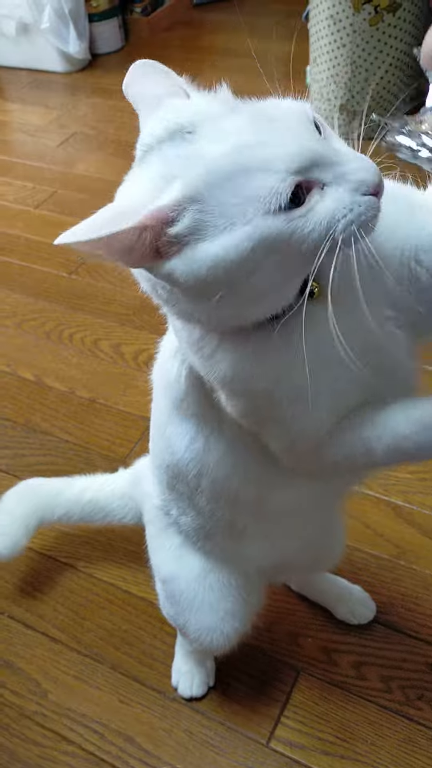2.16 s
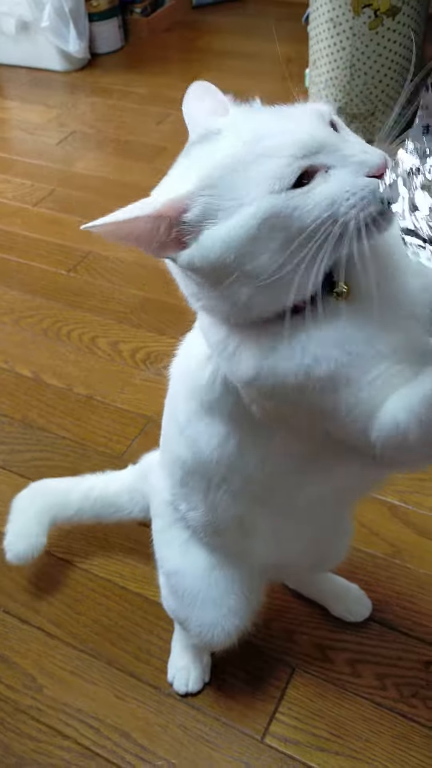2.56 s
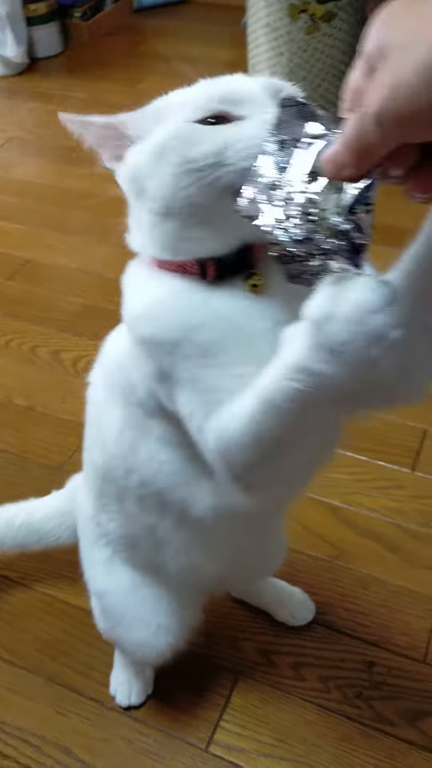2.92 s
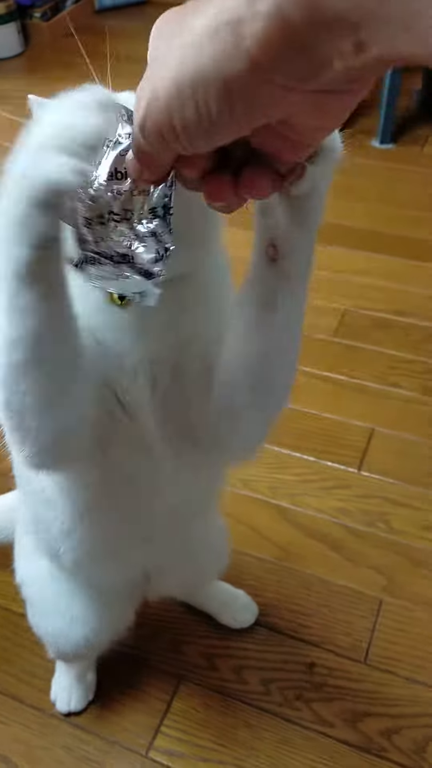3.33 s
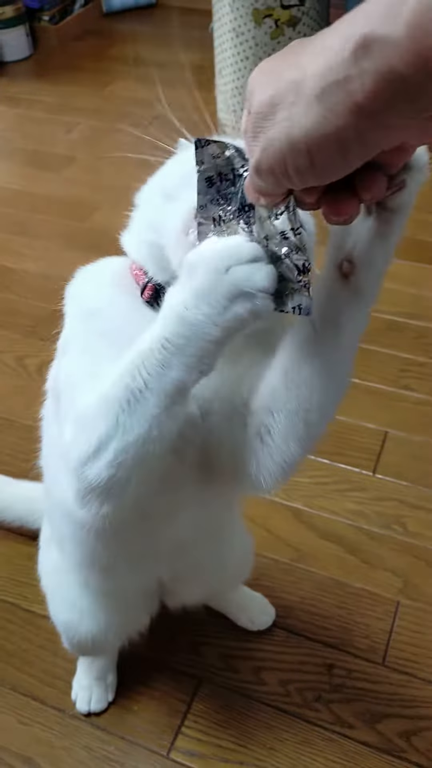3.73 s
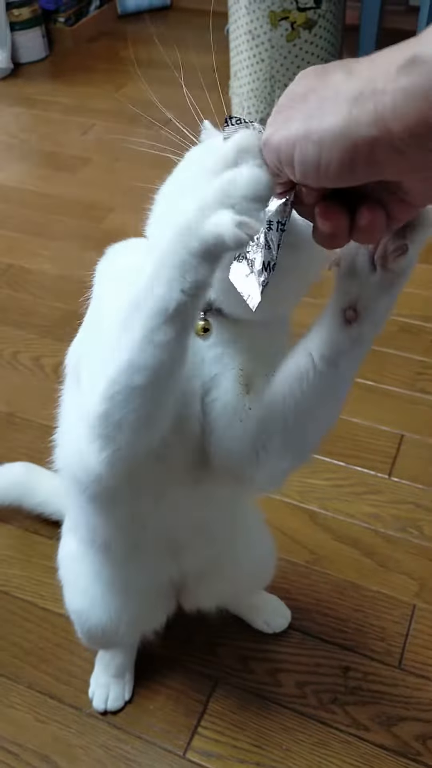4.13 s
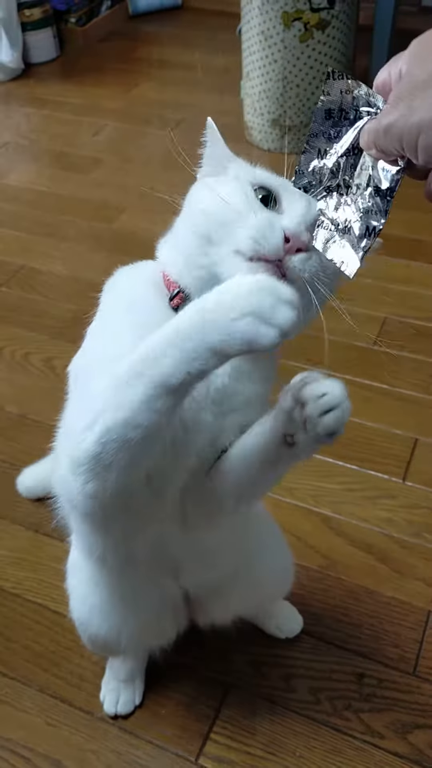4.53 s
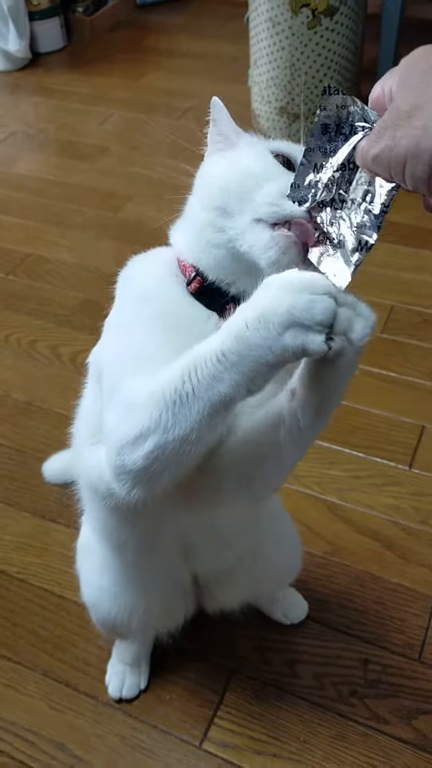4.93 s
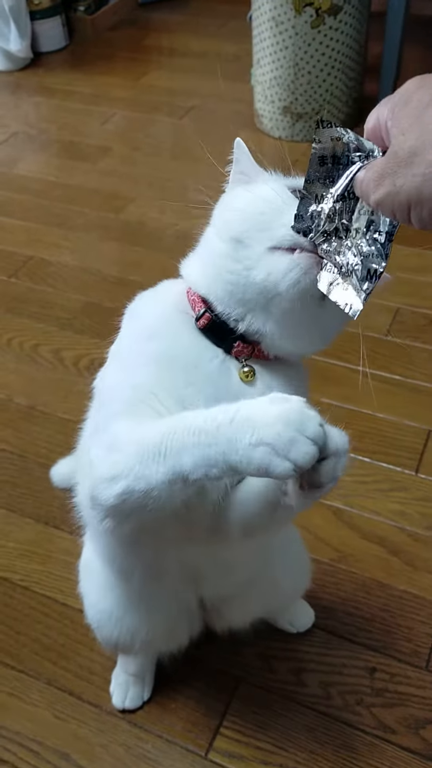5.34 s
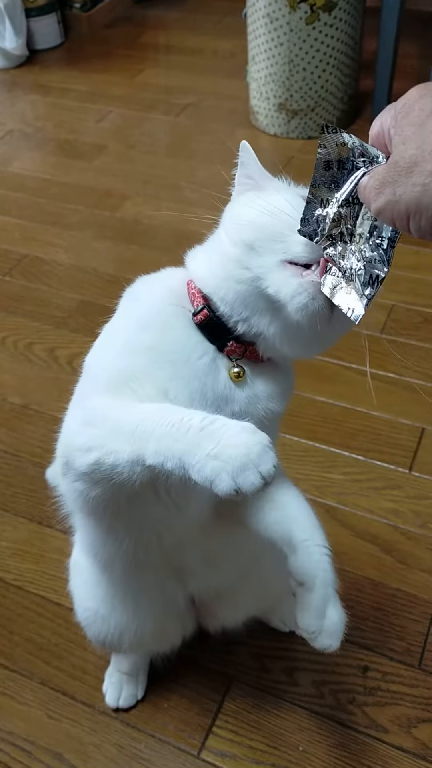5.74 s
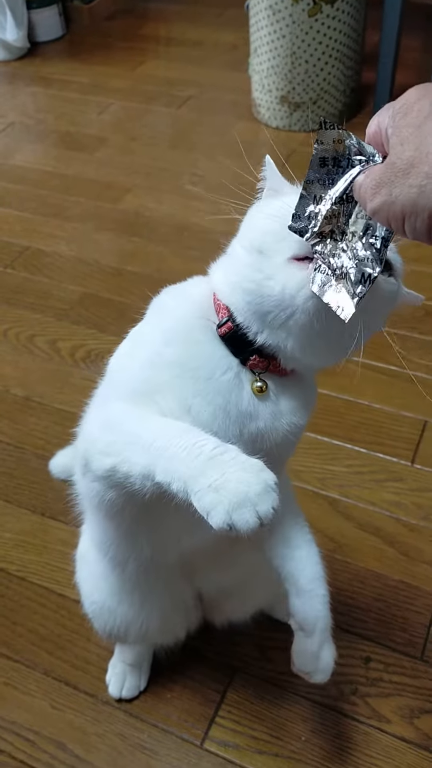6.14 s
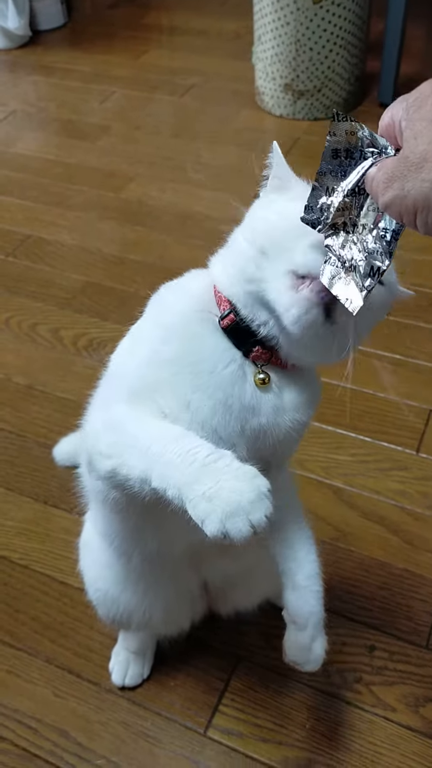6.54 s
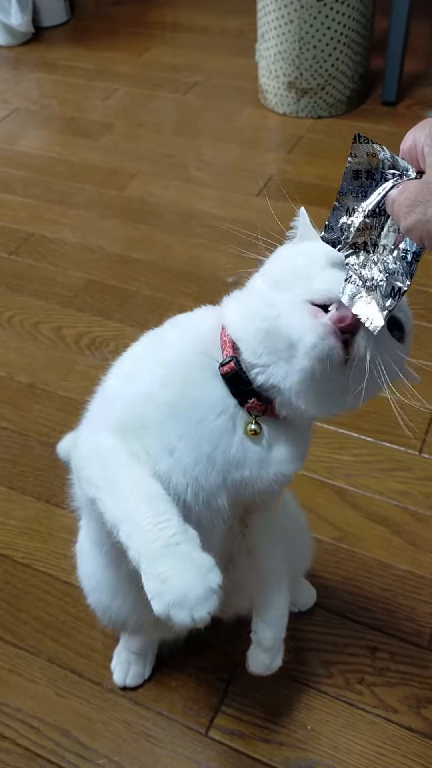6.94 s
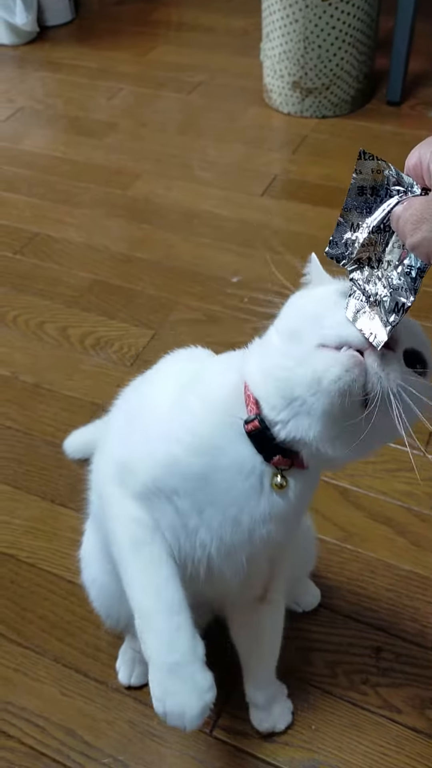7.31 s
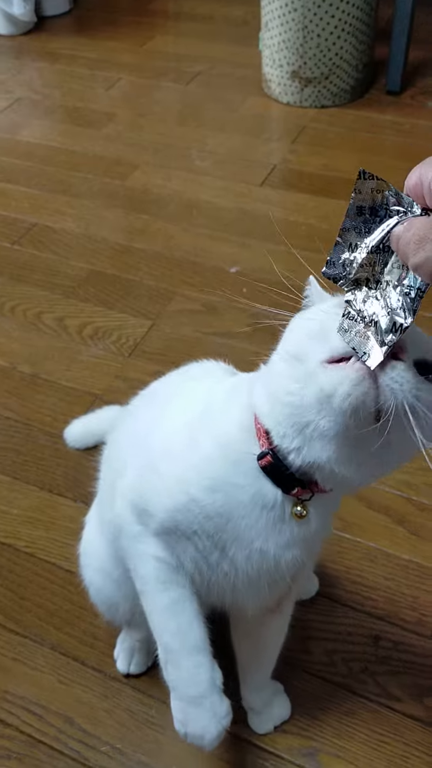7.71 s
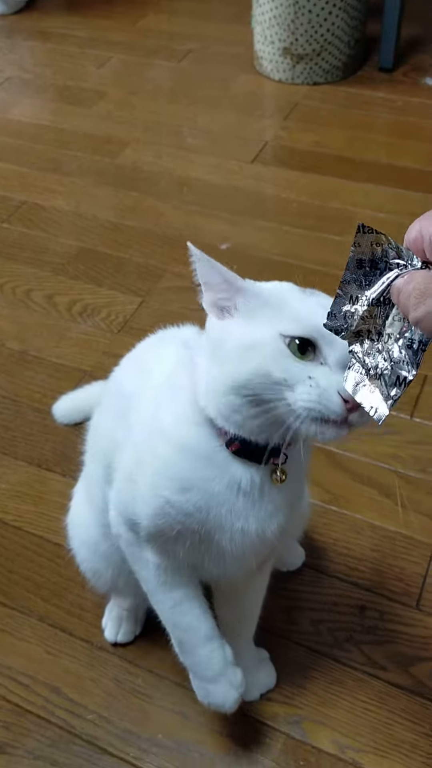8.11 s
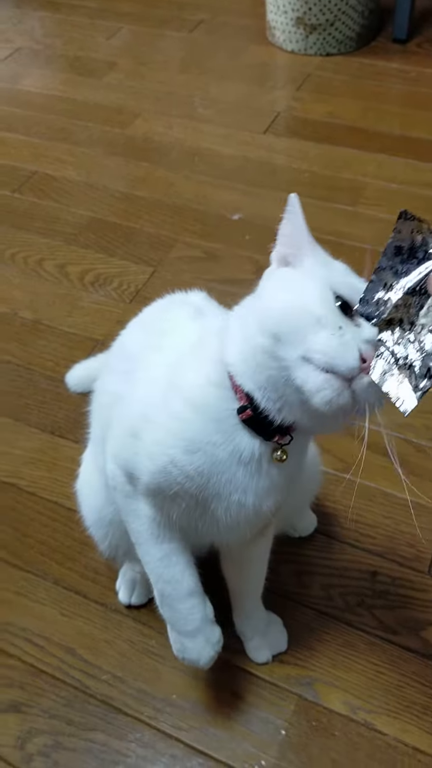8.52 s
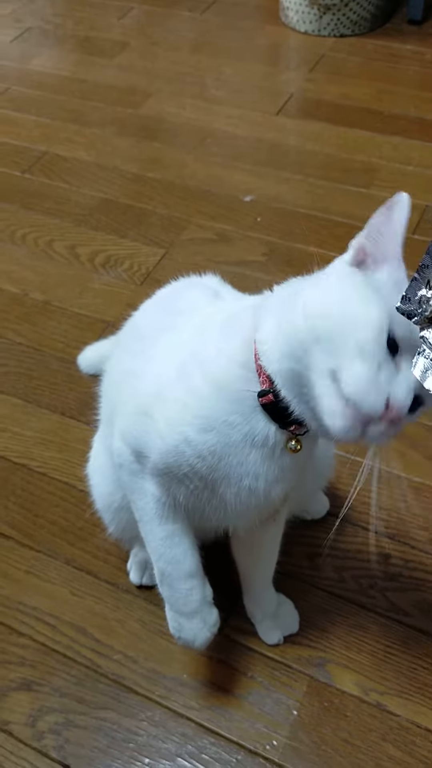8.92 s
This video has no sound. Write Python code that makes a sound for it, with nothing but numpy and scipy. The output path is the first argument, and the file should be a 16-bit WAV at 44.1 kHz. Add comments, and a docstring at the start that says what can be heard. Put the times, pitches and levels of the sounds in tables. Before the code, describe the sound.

Close, bright foil crinkling and snapping in bursts for five seconds, then sparse soft rustles, a tiny collar bell and distant bird whistles.

```python
"""A crumpled foil packet, bitten, pawed and licked by a cat in a wood-floored room.
Creases are struck decaying modes; rustle is dense ringing grains plus rubbing noise; folds pop.
A collar bell (struck modes) tinkles, a bird (gliding near sines) whistles further off,
and air noise, a low resonance and a wavering hum lie under it all. Treble is cut steeply."""
import sys
import numpy as np
from scipy import signal
from scipy.fft import rfft, irfft, next_fast_len
from scipy.io import wavfile
from scipy.ndimage import uniform_filter1d

SR = 44100
rng = np.random.default_rng(int(sys.argv[2]) if len(sys.argv) > 2 else 0)


def convert_level_to_amplitude(level_db):
    """Map a level in decibels to its linear amplitude factor."""
    exponent = np.asarray(level_db, float) / 20
    return 10 ** exponent


def transcribe(signal):
    """Save signal, clipped to [-1, 1], as a 16-bit WAV file at the path in sys.argv[1]."""
    frames = np.atleast_2d(signal).T
    limited = np.clip(frames, -1, 1)
    pcm = np.round(limited * 32767).astype(np.int16)
    wavfile.write(sys.argv[1], SR, pcm)


N = 404397


def rms_one(x):
    """Scale to rms 1."""
    return x / np.sqrt(np.mean(x ** 2) + 1e-20)


def in_time(rows):
    """Interpolate each column of a time curve to one value per sample."""
    s, *columns = np.transpose(rows)
    return [np.interp(np.arange(N) / SR, s, c) for c in columns]


def coloured(x, spectrum):
    """Filter a steady sound by a dB curve, linear over log frequency."""
    size = next_fast_len(N)
    hz = np.maximum(np.fft.rfftfreq(size, 1 / SR), 1)
    point_hz, point_db = np.transpose(spectrum)
    gain = convert_level_to_amplitude(np.interp(np.log(hz), np.log(point_hz), point_db))
    return irfft(rfft(x, size) * gain, size)[:N]


def drift(rate_hz):
    """Slow random curve, rms 1: noise through a two-pole lowpass, run in for 1 s."""
    r = np.exp(-2 * np.pi * rate_hz / SR)
    return rms_one(signal.lfilter([1], [1, -2 * r, r * r], rng.standard_normal(N + SR))[SR:])


def struck(modes, strengths, t):
    """Sum of exponentially decaying sines, scaled to peak 1."""
    hz, level_db, t60_s = np.transpose(modes)[:, :, None]
    envelopes = strengths[:, None] * convert_level_to_amplitude(level_db - 60 * t / t60_s)
    x = np.sum(envelopes * np.sin(2 * np.pi * hz * t), axis=0)
    return x / np.max(np.abs(x))


def add(out, s, x):
    """Mix a short sound in at time s."""
    i = max(round(s * SR), 0)
    out[i:i + len(x)] += x[:N - i]


# air noise spectrum, relative: f/Hz, level/dB
AIR_SPECTRUM = [(62, -26.5), (105, -3.5), (136, -3), (215, -4), (625, -19), (1170, -20), (1620, -25),
                (3450, -22), (5470, -36), (7200, -26), (8500, -41.5), (11000, -71.5), (18700, -120)]
# air noise rms in 100-450 Hz: t/s, level/dB
AIR_BAND_LEVEL = [(0.0, -71), (3.47, -70.5), (9.17, -76.5)]
# low room resonance, rms at mean air level: f/Hz, width/Hz, level/dB
ROOM_RUMBLE = [(42.4, 21, -66)]


def background():
    """Air noise, noise in a low resonance and a wavering motor hum, all on the air level curve."""
    hum_hz, hum_db = 85.4, -68
    air = coloured(rng.standard_normal(N), AIR_SPECTRUM)
    band = signal.butter(4, [100, 450], "band", fs=SR, output="sos")
    air = air / np.std(signal.sosfilt(band, air))
    level = convert_level_to_amplitude(in_time(AIR_BAND_LEVEL)[0])

    phase = 2 * np.pi * np.cumsum(hum_hz + 3.5 * drift(6.0)) / SR
    low_end = convert_level_to_amplitude(hum_db + 2.0 * drift(7.5)) * np.sqrt(2) * np.sin(phase)
    for hz, width_hz, level_db in ROOM_RUMBLE:
        r = np.exp(-np.pi * width_hz / SR)
        poles = [1, -2 * r * np.cos(2 * np.pi * hz / SR), r * r]
        tone = signal.lfilter([1, 0, -1], poles, rng.standard_normal(N + SR))[SR:]
        low_end += convert_level_to_amplitude(level_db) * rms_one(tone)
    return level * (air + low_end / np.mean(level))


# steady rustle, how firmly the packet is held and worked: t/s, level/dB
HANDLING_LEVEL = [(0.0, -56), (0.45, -67), (0.52, -71), (0.9, -67), (2.1, -64), (2.3, -78), (2.45, -61),
                  (2.95, -74.5), (3.6, -58.5), (4.15, -61), (4.25, -69), (4.95, -65.5), (5.07, -68.5),
                  (5.5, -70.5), (5.7, -76), (9.17, -80)]
# paw or tongue drags over the foil: t/s at top, level/dB, swell/s per 10 dB
FOIL_DRAGS = [(0.14, -55.5, 0.026), (1.159, -60.5, 0.076), (1.512, -51.5, 0.034), (2.0, -51.5, 0.049),
              (2.75, -47, 0.024), (3.31, -52, 0.08), (3.912, -48.5, 0.11), (4.979, -61, .06),
              (5.272, -60.5, 0.075), (5.562, -61.5, .03), (6.11, -54.5, 0.019), (6.402, -58.5, 0.02),
              (7.001, -62.5, 0.031), (7.668, -56, .04), (7.888, -61.5, 0.096)]


def rustle_level():
    """Power sum in dB: steady handling, a flurry of small creases around each snap, and drags."""
    flurry_db, follows_snap = -57.5, 0.6     # flurry top at a -24 dB snap; dB per dB of snap
    build_db_per_s, fade_db_per_s = 902.5, 152
    t = np.arange(0, N, 50)[:, None] / SR
    s, peak_db = np.transpose(CREASE_SNAPS)
    slope_db = np.where(t < s, build_db_per_s * (s - t), fade_db_per_s * (t - s))
    flurries = flurry_db + follows_snap * (peak_db + 24) - slope_db
    s, top_db, swell_s = np.transpose(FOIL_DRAGS)
    drags = top_db - 10 * np.abs(t - s) / swell_s
    power = np.sum(convert_level_to_amplitude(2 * flurries), axis=1) + np.sum(convert_level_to_amplitude(2 * drags), axis=1)
    power = np.interp(np.arange(N) / SR, t[:, 0], power)
    return 10 * np.log10(power + convert_level_to_amplitude(2 * in_time(HANDLING_LEVEL)[0]))


# rustle spectrum before the packet turns, relative: f/Hz, level/dB
RUSTLE_SPECTRUM = [(290, -49), (500, -18), (1250, -15.5), (1620, -20), (2120, -12), (2760, -14), (4700, 1),
                   (7200, -13), (8500, -28.5), (11000, -64), (18700, -120)]
# the packet turns, and rings higher from about 5.5 s, in the quieter handling: t/s, share turned 0-1
PACKET_TURN = [(4.9, 0.23), (5.5, 1)]
TURN_PITCH_RATIO = 1.11     # at share 1


def rustle(level_db):
    """Tiny creases in clumps, unequal in size, over the hiss of fur and tongue on foil."""
    # harder handling, more creases: 600/s at -66 dB
    per_s = 600 * convert_level_to_amplitude(0.22 * (level_db + 66.0) + 4.8 * drift(25))
    sizes = convert_level_to_amplitude(6 * np.minimum(rng.exponential(1, N), 3.5)) * rng.choice([-1, 1], N)
    born = rng.random(N) < per_s / SR
    pitches_hz, dealt = np.geomspace(1500, 7500, 8), rng.integers(0, 8, N)
    grains = 0
    for k, hz in enumerate(pitches_hz):
        r = convert_level_to_amplitude(-60 * hz / (7.0 * SR))     # 60 dB decay in 7 cycles
        w = 2 * np.pi * hz / SR
        hits = sizes * born * (dealt == k) + 1e-18
        grains = grains + signal.lfilter([0, w], [1, -2 * r * np.cos(w), r * r], hits)
    grains = grains / np.sqrt(uniform_filter1d(per_s, size=2000))     # level out crease density

    rub = rng.standard_normal(N) * convert_level_to_amplitude(2.5 * drift(30))
    mix = convert_level_to_amplitude(-3.5) * rms_one(grains) + rub
    turned, = in_time(PACKET_TURN)
    higher = np.array(RUSTLE_SPECTRUM) * [TURN_PITCH_RATIO, 1]
    before = rms_one(coloured(mix, RUSTLE_SPECTRUM))
    after = rms_one(coloured(mix, higher))
    return convert_level_to_amplitude(level_db) * ((1 - turned) * before + turned * after)


# creases snapping through: t/s, peak level/dB
CREASE_SNAPS = [(0.0363, -36.5), (0.0894, -26), (0.1299, -38), (0.197, -38), (0.337, -34.5),
                (0.3898, -37.5), (0.417, -27.5), (0.5572, -25.5), (0.6, -15), (0.6117, -22), (0.6222, -28),
                (0.6554, -30.5), (0.664, -21.5), (0.6976, -28), (0.7401, -29), (0.766, -21),
                (0.7821, -18.5), (0.8034, -20), (0.814, -15), (0.8346, -18), (0.8655, -16.5), (0.8799, -27),
                (0.904, -16.5), (1.0372, -18.5), (1.1365, -30.5), (1.1422, -28), (1.1585, -27),
                (1.1897, -31.5), (1.287, -29.5), (1.3037, -26), (1.3678, -34), (1.407, -32.5),
                (1.4259, -12.5), (1.491, -19.5), (1.513, -20), (1.5254, -22.5), (1.5709, -27),
                (1.613, -30.5), (1.6444, -24.5), (1.6648, -9.5), (1.6734, -29), (1.7881, -36.5),
                (1.8144, -32.5), (1.8485, -17), (1.911, -27), (1.922, -28), (1.9618, -15.5), (1.973, -24.5),
                (2.0099, -18.5), (2.1723, -23), (2.4667, -35.5), (2.5187, -32.5), (2.5842, -18),
                (2.6251, -33.5), (2.6588, -26.5), (2.7334, -29), (2.7469, -25), (2.7901, -27.5),
                (2.8384, -12.5), (2.8518, -33.5), (2.9032, -37), (3.0095, -23.5), (3.0854, -18),
                (3.1745, -31.5), (3.1854, -31.5), (3.242, -33.5), (3.3945, -19.5), (3.4229, -17),
                (3.4358, -22.5), (3.4957, -18.5), (3.676, -39), (3.7227, -26.5), (3.7573, -19.5),
                (3.783, -29), (3.8107, -22.5), (3.8427, -26), (3.8498, -21), (3.8851, -32.5), (3.899, -15),
                (3.925, -26.5), (3.9636, -31), (3.9933, -26), (4.0465, -24.5), (4.1048, -34),
                (4.1688, -31.5), (4.3458, -24.5), (4.4122, -21.5), (4.4257, -27), (4.6965, -30.5),
                (4.7371, -33.5), (4.7498, -25.5), (4.7713, -20.5), (4.783, -22.5), (4.814, -17),
                (4.8257, -18.5), (4.8433, -22), (5.288, -34), (5.5513, -47), (5.676, -48), (5.945, -43.5),
                (6.1106, -45), (6.2761, -32), (6.334, -42), (6.528, -43), (7.134, -47.5), (7.225, -44.5),
                (7.637, -42), (7.6523, -38), (7.659, -29.5), (7.6666, -36)]
# packet modes before turn and scatter, bright facets then duller body: f/Hz, level/dB, t60/s
FOIL_MODES = [(3488, -8, 0.0042), (4478, 1, 0.0052), (5044, -3, 0.0048), (6340, -8, 0.0034),
              (7335, -9.5, 0.003)]
BODY_MODES = [(900, -32.5, 0.0087), (1350, -29, 0.0054), (1990, -31.5, 0.014), (2900, -16.5, 0.0042)]


def snaps(creases):
    """A facet buckles in under a millisecond and shakes the whole packet, differently each time."""
    out, t = np.zeros(N), np.arange(SR // 40) / SR
    rise = 1 - np.exp(-(t / 0.00046) ** 2)     # the crease takes a moment to run through
    luck = rng.standard_normal((len(creases), 18))
    for (s, peak_db), draw in zip(creases, luck):
        modes = np.array(FOIL_MODES + BODY_MODES)
        turned = np.interp(s, *np.transpose(PACKET_TURN))
        # every crease leaves the sheet in a new shape
        modes[:, 0] *= (1 + 0.055 * draw[:9]) * TURN_PITCH_RATIO ** turned
        strengths = convert_level_to_amplitude(3.5 * draw[9:]) * np.sign(draw[:9])
        snap = struck(modes, strengths, t) * rise
        add(out, s, convert_level_to_amplitude(peak_db) * snap / np.max(np.abs(snap)))
    return out


def lesser_snaps(level_db):
    """Extra snaps at chance moments, more often and louder where the rustle is strong."""
    per_s, over_rustle_db, spread_db = 16, 17, 3     # rate at -55 dB rustle
    chance = rng.random((400, 3))
    around_db = level_db[(chance[:, 0] * N).astype(int)]
    expected = per_s * convert_level_to_amplitude(0.6 * (around_db + 55)) * N / SR
    kept = chance[:, 1] < expected / len(chance)
    peak_db = around_db + over_rustle_db - spread_db * np.log(chance[:, 2] + 0.026)
    return list(zip(chance[kept, 0] * N / SR, peak_db[kept]))


# collar bell hits: t/s, peak level/dB
BELL_HITS = [(0.1532, -35.5), (3.316, -37), (4.2675, -43), (8.3645, -49), (8.4327, -62), (8.4798, -52),
             (8.581, -52.5), (8.6457, -65.5), (8.672, -57), (8.737, -45.5), (8.8188, -60), (8.8675, -53)]
# bell modes before strength scatter: f/Hz, level/dB, t60/s
BELL_MODES = [(6900, 0, .014), (7150, -2, .03), (6200, -10, .006)]


def bell():
    """The pellet hits the shell, then bounces once, softer, about 16 ms later."""
    out, t = np.zeros(N), np.arange(SR // 5) / SR
    count = len(BELL_MODES)
    luck = rng.standard_normal((len(BELL_HITS), count + 1))
    for (s, peak_db), draw in zip(BELL_HITS, luck):
        hit = convert_level_to_amplitude(peak_db) * struck(BELL_MODES, convert_level_to_amplitude(4.4 * draw[:count]), t)
        add(out, s, hit)
        add(out, s + 0.016 + 0.0015 * draw[-1], convert_level_to_amplitude(-9.5) * hit)
    return out


# short fading glides: start t/s, length/s, from f/Hz, to f/Hz, start level/dB
BIRD_TWITTERS = [(0.247, 0.047, 3880, 4600, -65), (0.289, 0.044, 4000, 3200, -65),
                 (4.938, 0.021, 4500, 6100, -61), (4.968, 0.056, 6100, 6920, -72),
                 (.95, 0.056, 3300, 3150, -70), (6.972, 0.055, 3290, 3120, -77),
                 (7.51, .05, 3950, 3100, -81), (7.61, 0.03, 2750, 3300, -73)]
# whistle rising in steps: t/s re top, f/Hz, level/dB re phrase
BIRD_PHRASE = [(-.16, 3200, -18), (-.135, 3650, -7), (-.115, 3780, -5), (-.097, 4480, -4), (-.045, 4720, 0),
               (-.028, 5450, -1), (0, 6050, -6), (.02, 6050, -16)]
# whistled phrases: t/s at top, level/dB
PHRASE_TIMES = [(4.641, -58), (5.258, -59), (7.474, -63.5)]


def bird():
    """Gliding near sines with slightly unsteady pitch and breath."""
    twitter_fade_db = 2.5
    out, t = np.zeros(N), np.arange(N) / SR
    unsteady = 1 + .007 * drift(200)
    notes = []
    for s, length_s, from_hz, to_hz, db in BIRD_TWITTERS:
        notes.append([(s, from_hz, db), (s + length_s, to_hz, db - twitter_fade_db)])
    for top_s, level_db in PHRASE_TIMES:
        notes.append(np.array(BIRD_PHRASE) + [top_s, 0, level_db])
    for note in notes:
        hz, level_db = in_time(note)
        gate = np.clip(np.minimum(t - note[0][0], note[-1][0] - t) / 0.002, 0, 1)
        tone = np.sin(2 * np.pi * np.cumsum(hz * unsteady) / SR)
        out += np.sqrt(2) * gate * convert_level_to_amplitude(level_db) * tone
    return out * convert_level_to_amplitude(2.4 * drift(90))


# hollow folds popping in or out: t/s, peak level/dB, f/Hz
FOLD_POPS = [(0.6126, -34, 3140), (0.815, -30.5, 2880), (0.903, -35.5, 2310), (1.303, -48, 3100),
             (2.0082, -29.5, 1270), (2.1708, -31, 2960), (2.7477, -51, 3100), (3.0087, -48, 1430),
             (3.397, -41, 1350), (3.495, -39, 1365), (3.723, -43, 1205), (3.844, -32.5, 2280),
             (3.8507, -29, 2140), (3.9012, -38.5, 2370), (4.1153, -43, 2900), (4.129, -45, 2900),
             (4.171, -44, 2900), (6.109, -51.5, 2320), (6.2768, -52.5, 2260), (7.662, -43.5, 2500),
             (7.679, -46, 2800), (7.7953, -57.5, 2420), (8.069, -63.5, 1135), (8.134, -60.5, 900)]


def pops():
    """A pocket of air under a fold rings for a few ms, with weaker partners below."""
    out, t = np.zeros(N), np.arange(SR // 20) / SR
    for s, peak_db, hz in FOLD_POPS:
        modes = [(hz, 0, .011), (.75 * hz, -7, .008), (.5 * hz, -10, .008)]
        pop = struck(modes, np.array([1, -1, 1]), t)
        pop *= 1 - np.exp(-(t / 0.0015) ** 2)     # soft onset
        add(out, s, convert_level_to_amplitude(peak_db) * pop / np.max(np.abs(pop)))
    return out


# tongue tick mode before pitch scatter: f/Hz, level/dB (scaled out), t60/s
LICK_MODES = [(2100, 1, 0.011)]


def tongue():
    """One lick: the rough tongue ticks over a fold, at uneven gaps, pitches and levels."""
    s, gap_s = 5.647, 0.0105
    tick_db, spread_db = -60, 2.5
    out, t = np.zeros(N), np.arange(SR // 40) / SR
    for pitch, level, gap in rng.standard_normal((18, 3)):
        modes = np.array(LICK_MODES) * [1 + .04 * pitch, 1, 1]
        add(out, s, convert_level_to_amplitude(tick_db + spread_db * level) * struck(modes, np.ones(1), t))
        s += gap_s * convert_level_to_amplitude(6 * gap)
    return out


def room(x):
    """Echoes off floor and walls: sparse at first, then a dense tail; unit energy overall."""
    t60_s = 0.14
    t = np.arange(SR // 2) / SR
    density = np.clip((t / .04) ** 2 + 0.015, 0, 1)
    echoes = rng.standard_normal(len(t)) * (rng.random(len(t)) < density) / np.sqrt(density)
    tail = echoes * (t > .0015) * convert_level_to_amplitude(-60 * t / t60_s)
    return signal.fftconvolve(x, tail / np.sqrt(np.sum(tail ** 2)))[:N]


def scene():
    """Packet and bell are near, the bird is far and mostly echo; both channels are equal."""
    near_room_db, bird_room_db = -10.5, 2
    level_db = rustle_level()
    creases = CREASE_SNAPS + lesser_snaps(level_db)
    near = snaps(creases) + pops() + bell() + tongue()
    far = bird()
    echo = room(convert_level_to_amplitude(near_room_db) * near + convert_level_to_amplitude(bird_room_db) * far)
    mono = near + rustle(level_db) + far + echo + background()
    return np.array([mono, mono])


def low_pass(x):
    """Removes everything above the highest recorded frequency."""
    return signal.sosfilt(signal.butter(12, 8800, fs=SR, output="sos"), x)


def record(dry):
    """A steep treble cut, 60 dB down at the stop edge, and a faint converter hiss."""
    stop_edge_hz, hiss_db = 9270, -98
    cut = signal.sosfilt(signal.cheby2(10, 60, stop_edge_hz, fs=SR, output="sos"), dry)
    mix = cut + convert_level_to_amplitude(hiss_db) * rng.standard_normal(N)
    return low_pass(mix)


dry = scene()
out = record(dry)
transcribe(out)
```